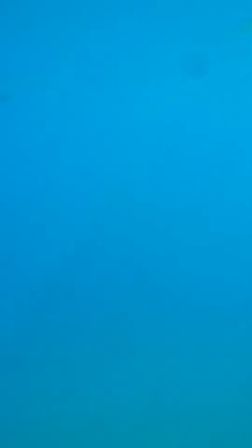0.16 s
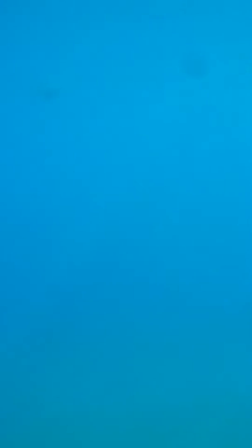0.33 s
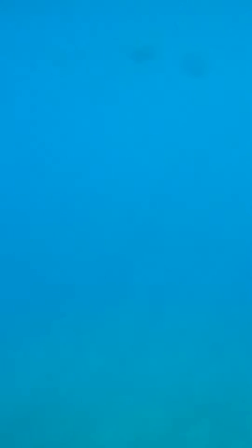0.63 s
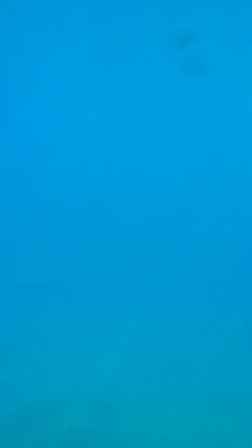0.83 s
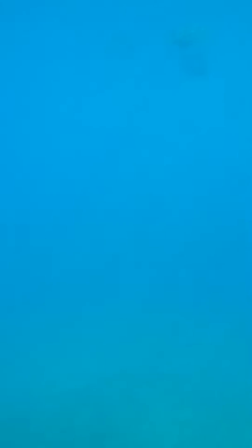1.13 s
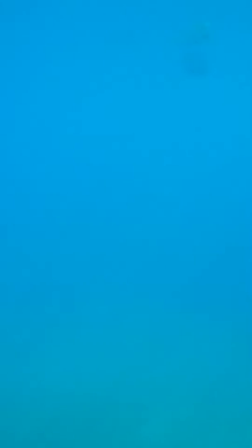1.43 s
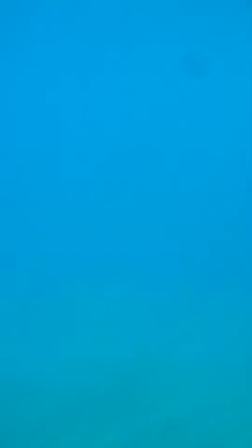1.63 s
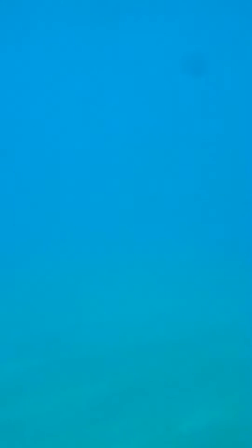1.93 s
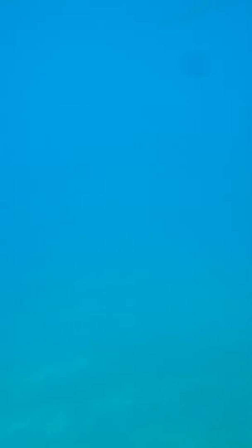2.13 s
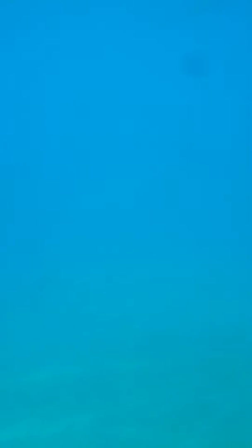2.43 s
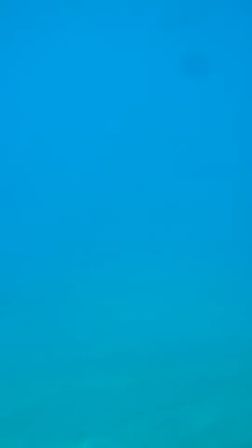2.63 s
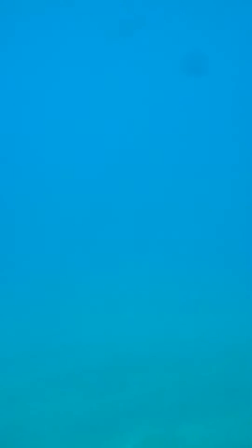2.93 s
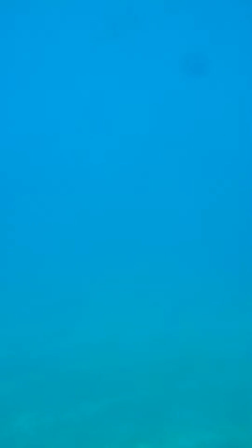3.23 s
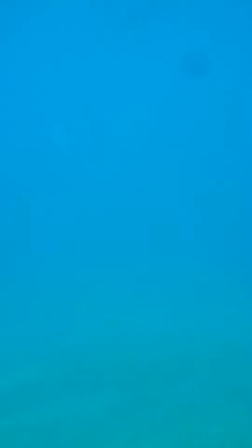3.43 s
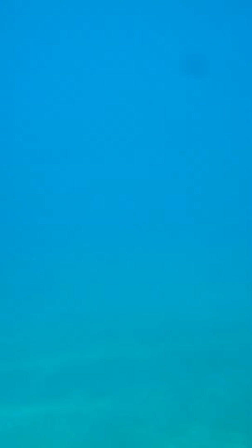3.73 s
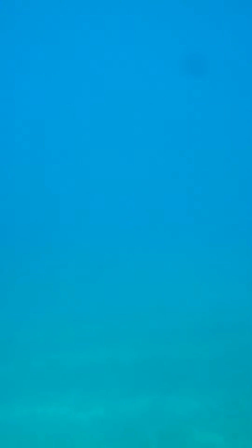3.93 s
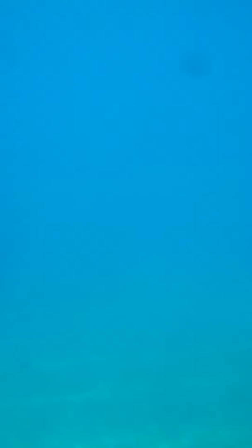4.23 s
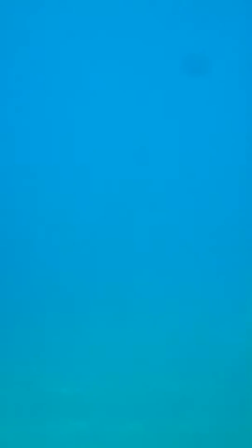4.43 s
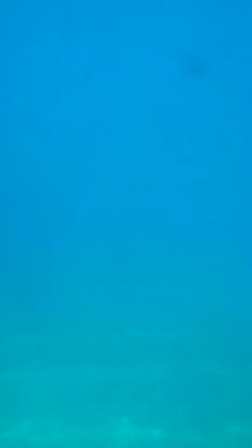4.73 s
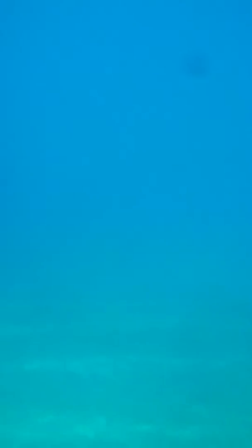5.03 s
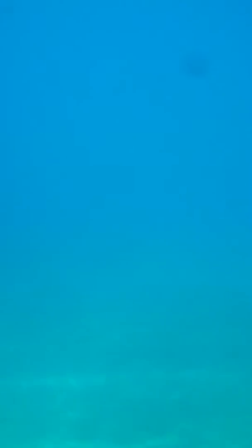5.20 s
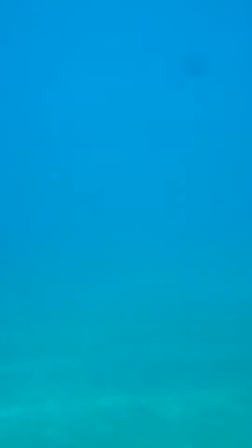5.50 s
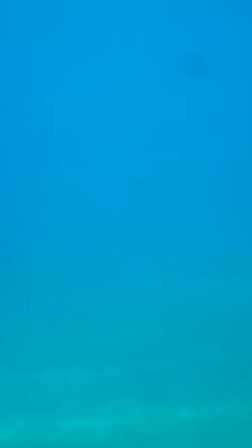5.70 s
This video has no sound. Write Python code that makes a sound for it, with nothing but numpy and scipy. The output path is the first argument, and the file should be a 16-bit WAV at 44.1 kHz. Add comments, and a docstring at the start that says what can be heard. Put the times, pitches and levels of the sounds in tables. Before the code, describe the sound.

Underwater, a boat engine and propeller drone with a low throbbing hum that turns rougher, amid snapping shrimp and a few bubble gulps.

```python
"""Under water near a moving boat, on two microphones in a sealed housing; shrimp snap all around.
From the start the shaft orders hum and beat into a throb, the machinery rattles in step with the crank,
and a few bubbles gulp close by. From about 2 s the paths through the water add up to a sliding boom.
Near 3 s the direct path from the engine drops away, and the gear whine and valve ticks fade with it.
Towards the end the propeller churns hardest and the loudest shrimp cracks nearby."""
import sys
import numpy as np
from scipy import signal
from scipy.fft import rfft, irfft
from scipy.io import wavfile
from scipy.ndimage import uniform_filter1d, minimum_filter1d, map_coordinates

SR = 44100
rng = np.random.default_rng(int(sys.argv[2]) if len(sys.argv) > 2 else 0)


def inscribe(sig):
    """Save sig as 16-bit PCM at rate SR to the path in sys.argv[1].

    A 1-D sig is mono; a 2-D sig holds one channel per row.
    Samples are clipped to [-1, 1] before scaling.
    """
    pcm = np.round(np.clip(np.atleast_2d(sig).T, -1, 1) * 32767)
    wavfile.write(sys.argv[1], SR, pcm.astype(np.int16))


N = 258426
TIME, BINS = np.arange(N) / SR, np.fft.rfftfreq(N, 1 / SR)

# Engine speed; an order is a multiple of it. Each row: time in seconds, crank turns per second.
CRANK_SPEED = [(0.0, 29.54), (0.25, 29.59), (1.75, 29.4), (2.0, 29.78), (2.25, 29.58), (2.75, 29.52),
               (3.0, 28.94), (3.75, 29.65), (4.0, 29.71), (4.5, 29.51), (4.75, 28.92), (5.0, 28.99),
               (5.25, 28.67), (5.86, 28.58)]
# The firing note (order 3) and the hum (order 6). Each row: time in seconds, level in dB.
FIRING_LEVEL = [(0, -20), (.8, -24), (2.6, -26), (3.7, -35.5), (4.7, -38), (5.86, -30)]
HUM_LEVEL = [(0, -12.5), (.33, -10), (.8, -16.5), (1.3, -12.5), (1.8, -16), (2.2, -12), (3.85, -15.5),
             (4.22, -12), (4.85, -19), (5.5, -13.5), (5.86, -16.5)]
# Tones that beat against the hum. Each row: order, level in dB.
BEATING_ORDERS = [(7, -23), (8, -32.5), (9, -43)]
# Faint shaft tones. Each row: order, level in dB, dB gained per dB of the direct path.
WEAK_ORDERS = [(1, -50, 0.1), (2, -48, 0), (4, -34, 0), (5, -32, 0.5), (12, -42.5, .5), (13, -42, 0.5)]
# The band where paths through the water add up; it slides as the boat moves and lifts the strong
# orders it meets. Each row: time in seconds, centre in Hz, level in dB.
BOOM_BAND = [(0, 195, -42.5), (1.1, 223.6, -41), (1.95, 224.2, -21), (2.6, 228, -21.5), (3.05, 210, -15),
             (3.5, 250.6, -27.5), (3.88, 241, -18), (4.03, 205.4, -14.5), (4.25, 174, -28),
             (4.65, 202, -21), (4.9, 249, -18), (5.22, 254.7, -15.5), (5.4, 194, -15), (5.86, 194.3, -16)]
# The direct path from engine to microphones. Each row: time in seconds, gain in dB.
DIRECT_PATH = [(0, -0.6), (1.8, 0), (2.85, -0.5), (3.25, -13), (5.86, -20.5)]
# How hard the propeller churns. Each row: time in seconds, gain in dB.
PROPELLER_SURGE = [(0, 1.8), (.4, 1.45), (.9, -3.5), (2.65, 2.6), (3.03, -1.8), (3.35, 1), (3.75, 0.86),
                   (4.65, -3), (5.15, 0.5), (5.65, 4), (5.86, 2.6)]
# How the rattle pulses over the engine's cycle. Each row: order, relative depth.
KNOCK_ORDERS = [(.5, .2), (1, 0.36), (2, 0.13), (3, 0.38), (4, 0.13), (5, 0.31), (7, 0.099)]
# The gear mesh series. Each row: factor on the whine's pitch, relative level in dB.
MESH_PARTIALS = [(.8, -6.5), (0.999, 2), (1.2, -11)]
# Hull modes that ring throughout. Each row: pitch in Hz, width in Hz, relative level in dB.
STEADY_MODES = [(1028, 45, -4), (1135, 76, -0.5)]
# Hull modes that swell once as the boat moves. Each row: time of the peak in seconds,
# half-width of the swell in seconds, level in dB, pitch in Hz, glide in Hz per second, width in Hz.
SWELLING_MODES = [(1.9, .95, -44, 561, -48.5, 66), (3.0, 1, -50, 2353, 6, 100.3),
                  (3.6, .6, -36.5, 925, 12, 129.7), (4.049, 0.32, -39, 1107, 90.5, 70.4),
                  (4.65, 0.21, -57, 3480, 0, 280), (5.3, .45, -51.5, 1854, 15.5, 27.9),
                  (5.2, .12, -33.5, 1147, -30, 50), (5.55, 0.23, -42, 749, -40, 70.3),
                  (5.65, .17, -38, 1025, -250, 49.7)]
# The tone colour of each noise. Each row: frequency in Hz, relative level in dB.
WASH_SPECTRUM = [(200, -13.5), (280, 3), (340, -3.5), (410, -6.5), (480, -14), (560, -13), (680, -17.5),
                 (800, -24)]
HULL_SPECTRUM = [(600, -18), (780, -6), (860, -8.5), (960, -7), (1030, 1.5), (1090, -8.5), (1170, -2.5),
                 (1230, -8), (1350, -27)]
GEAR_SPECTRUM = [(1150, -17), (1300, -1), (1420, -3), (1540, -5.5), (1660, 4), (1830, 1.5), (2100, 0.5),
                 (2350, 0), (2700, -4.5), (3200, -10), (4200, -17), (4800, -23)]
HISS_SPECTRUM = [(4800, -12), (6100, -2), (7200, -1.5), (8000, -9), (9000, -15), (10500, -19.5),
                 (12000, -43.5)]
RUMBLE_SPECTRUM = [(15, -32), (45, -29.5), (62, -16.5), (80, -2), (120, -3.5), (160, 10), (215, 11.5),
                   (255, -4), (290, -9), (350, -22)]
SNAP_SPECTRUM = [(2500, -9), (4800, -8), (6200, 4), (7300, 3.5), (8500, -12.5), (10300, -13),
                 (12300, -22.5), (14200, -18.5), (15000, -33)]
# Bubbles by the housing. Each row: start in seconds, peak in dB, pitch in Hz, seconds to fall 60 dB.
CLOSE_BUBBLES = [(.451, 3.5, 162.9, .09), (.86, -30, 716, 0.11), (.907, -8.5, 160, .09),
                 (1.085, -31.5, 806, 0.11), (1.112, -28.5, 694, 0.099), (1.684, -5.5, 148.4, 0.043),
                 (2.339, -15.5, 388, 0.059), (2.469, -11, 331, 0.045), (2.75, -23, 883, 0.075),
                 (3.29, -28.5, 713, 0.042), (3.579, -12, 160, 0.054), (4.114, 0, 170, 0.066),
                 (4.365, -23.5, 932, 0.068)]
# Nearby shrimp. Each row: start in seconds, relative peak in dB, lower-treble boost in dB.
NEAR_SNAPS = [(0.1585, -29, 14.5), (0.344, -25, 3), (1.6815, -27, 5), (1.81, -35.5, -4), (2.008, -30.5, 5),
              (2.117, -36, 7), (2.2306, -27.5, 3), (2.2577, -27, -3), (2.3325, -32.5, -2), (2.5336, -36, 2),
              (2.7385, -30, -4), (2.938, -35.5, -12), (3.029, -33, -12), (3.6828, -33, 2), (3.9454, -40, 6),
              (4.2788, -34.5, -7), (4.3302, -32, -5), (4.368, -35, -1), (4.9192, -33.5, -1),
              (5.376, -35.5, 3), (5.449, -25.5, 6), (5.5809, -21.5, 17), (5.638, -30.5, -3)]
# The housing at its two microphone ports. Each row: frequency in Hz, left over right in dB,
# phase lead of the left in radians, coherence.
MIC_PORTS = [(252, 0.87, 0, 1), (462, -3.5, 0.46, 1), (630, -6, 1, 0.85), (865, 5, 2.5, 0.72),
             (1215, 9, 3.5, 1), (1600, 1.5, 5.5, 0.22), (1870, 5, 4.5, 0.64), (2620, -3, 5.5, .92),
             (3370, 1, 4.5, 0.85), (4500, 17.5, 7, 0.17), (5640, 15, 7, 0.18), (7800, -9.5, 12, 0.1)]

# Noises that follow the surge. Each gives: base level in dB, dB per dB of surge, drift in dB per second.
WASH_LEVEL, HISS_LEVEL, SINGING_LEVEL = (-33.5, 1.4, -0.15), (-53.5, 1, -.05), (-61.5, 1.3, -.15)
HULL_LEVEL, MODE_LEVEL, GEAR_LEVEL = (-37.5, 0.81, .5), (-46.5, 0.98, 0.31), (-40.5, 1.05, -0.76)


def shaft_drone(angle, boom_width_hz=18.3, lag_rad=0.49):
    """Shaft orders beat into one throb a turn; the propeller's uneven wake shakes the higher ones most."""
    out = np.zeros(N, complex)
    strong = [(3, curve(FIRING_LEVEL)), (6, curve(HUM_LEVEL))] + BEATING_ORDERS
    for k, (order, db) in enumerate(strong):
        if k < len(strong) - 2:
            shake = 1 + .11 * waver(rate_hz=11)
        else:  # shallow water delays the top two orders, which rounds each throb
            delay = np.exp(-1j * lag_rad * (k - 1) * (k - 2))
            shake = (1 + .49 * waver(rate_hz=13)) * delay
        offset_hz = order * curve(CRANK_SPEED) - curve(BOOM_BAND)
        boom = amp(curve(BOOM_BAND, column=2)) * bell(offset_hz, boom_width_hz)
        out += (amp(db) + boom) * np.exp(1j * order * angle) * shake
    for order, db, share in WEAK_ORDERS:
        tone = np.exp(1j * (order * angle + 2 * np.pi * rng.random()))
        out += amp(db + share * curve(DIRECT_PATH)) * tone * (1 + .6 * waver(rate_hz=5.5))
    return np.sqrt(2) * out.real


def machinery(angle):
    """The crank drives the propeller, hull, gears and valves, so all pulse in step."""
    knocking = rattle(angle, repeat=0.49, depth=0.88)
    meshing = rattle(angle, repeat=0.5, depth=0.55)
    fizzing = rattle(angle, repeat=0.2, depth=0.34)
    churning = rattle(angle, repeat=0.42, depth=0.62)
    return wash(churning) + hull(knocking) + gears(meshing) + cavitation(fizzing) + valve_ticks(angle)


def rattle(angle, repeat, depth):
    """Noise that partly repeats every two crank turns and comes in knocks."""
    size = int(4 * np.pi * N / angle[-1])
    place = angle / (4 * np.pi) * size
    cycle = np.array([map_coordinates(rng.standard_normal(size), [place], mode="grid-wrap")
                      for _ in range(2)])
    noise = np.sqrt(repeat) * cycle + np.sqrt(1 - repeat) * rng.standard_normal((2, N))
    knocks = sum(weight * np.cos(order * angle + 2 * np.pi * rng.random())
                 for order, weight in KNOCK_ORDERS)
    return noise * np.exp(depth * knocks)


def wash(churning):
    """Water rushes off the propeller, louder as it surges."""
    return surging(WASH_LEVEL) * colour(churning, WASH_SPECTRUM)


def hull(knocking):
    """Knocks rattle the hull and ring its plates: two modes hold, the others swell and fade."""
    modes = surging(MODE_LEVEL) * sum(amp(db) * ring(knocking, hz, width) for hz, width, db in STEADY_MODES)
    for peak_s, swell_s, db, hz, glide, width in SWELLING_MODES:
        t = TIME - peak_s
        modes += amp(db) * bell(t, swell_s) * ring(knocking, hz + glide * t, width)
    return surging(HULL_LEVEL) * colour(knocking, HULL_SPECTRUM) + modes


def gears(meshing, whine_order=65.15, whine_db=-43):
    """Meshing teeth clatter through the hull; their whine arrives by the direct path."""
    clatter = surging(GEAR_LEVEL) * colour(through_plates(meshing), GEAR_SPECTRUM)
    whine_hz = whine_order * curve(CRANK_SPEED)
    whine = sum(amp(db) * ring(meshing, factor * whine_hz, width_hz=95) for factor, db in MESH_PARTIALS)
    return clatter + amp(whine_db + curve(DIRECT_PATH)) * whine


def cavitation(fizzing, singing_hz=6910, fall_hz_per_s=150):
    """The propeller's cavitation hisses, with a thin singing that slowly falls."""
    hiss = surging(HISS_LEVEL) * colour(through_plates(fizzing), HISS_SPECTRUM)
    singing = ring(fizzing, singing_hz - fall_hz_per_s * TIME, width_hz=380)
    return hiss + surging(SINGING_LEVEL) * singing


def valve_ticks(angle, base_db=-57.5, sharpness=7, uneven_db=4):
    """Eight short valve ticks in every two crank turns, each of its own strength."""
    phase = 4 * angle
    valve = (phase / (2 * np.pi) + .5).astype(int) % 8
    strength = amp(uneven_db * rng.standard_normal(8))[valve]
    gate = strength * np.exp(sharpness * (np.cos(phase) - 1))
    ticks = through_plates(gate * rng.standard_normal((2, N)))
    level_db = base_db + curve(PROPELLER_SURGE) + .6 * curve(DIRECT_PATH)
    return amp(level_db) * colour(ticks, [(3000, -9), (4400, 4), (4750, -7.5), (5200, 2.5), (5800, -10.5)])


def through_plates(x, depth_db=2.5, spacing_hz=70):
    """The hull's many plate modes comb a sound into fine peaks and dips."""
    knots = np.arange(0, SR / 2, spacing_hz)
    ripple = np.clip(rng.standard_normal(len(knots)), -2, 2)
    return irfft(rfft(x) * amp(depth_db * np.interp(BINS, knots, ripple)), N)


def bubbles(swell_cycles=1.1, rise=0.39):
    """Close to the housing, each bubble swells and rings briefly, its pitch climbing a little."""
    out, t = np.zeros(N), TIME[:SR // 4]
    for start, db, hz, t60 in CLOSE_BUBBLES:
        shape = (1 - np.exp(-(t * hz / swell_cycles) ** 2)) * amp(-60 * t / t60)
        tone = np.sin(2 * np.pi * hz * (t + rise * t ** 2))
        add(out, start, amp(db) * shape / shape.max() * tone)
    return out


def shrimp(near_db=7, far_db=-41.5, spread_db=4.0, far_per_s=14):
    """A few snaps near the microphones over a crackle of distant ones."""
    out = np.zeros((2, N))
    for start, db, body_db in NEAR_SNAPS:
        add(out, start, amp(db + near_db) * snap(body_db))
    for when, chance in rng.random((int(far_per_s * N / SR), 2)):
        db = far_db + spread_db * min(-np.log(chance), 2)
        add(out, when * N / SR, amp(db) * snap())
    return out


def snap(body_db=0, body_hz=3500, body_width_hz=1500, t60=0.017, tail_db=-23, tail_t60=0.39):
    """A shrimp's crack rings the housing and scatters off the sea bed; peak 1."""
    t = TIME[:SR // 10]
    spectrum = [(hz, db + body_db * bell(hz - body_hz, body_width_hz)) for hz, db in SNAP_SPECTRUM]
    decay = amp(-60 * t / t60) + amp(tail_db - 60 * t / tail_t60)
    crack = colour(rng.standard_normal((2, len(t))), spectrum) * decay
    return crack / abs(crack).max()


def rumble(db=-19.5):
    """Churned water booms behind the hum."""
    return amp(db) * colour(rng.standard_normal((2, N)), RUMBLE_SPECTRUM)


def housing(pair):
    """The shell's modes reach the two microphones with different strength and phase."""
    balance_db, lead, coherence = (response(MIC_PORTS, BINS, column) for column in (1, 2, 3))
    shared, separate = rfft(pair)
    left = shared * amp(balance_db)
    right = (coherence * shared + np.sqrt(1 - coherence ** 2) * separate) * np.exp(-1j * lead)
    return irfft(np.array([left, right]) * np.sqrt(2 / (1 + amp(balance_db) ** 2)), N)


def surging(level):
    """The gain of a noise that follows the propeller's surge and drifts as the boat moves."""
    db, share, drift = level
    return amp(db + share * curve(PROPELLER_SURGE) + drift * TIME)


def ring(drive, hz, width_hz):
    """A moving resonance of unit power: shift its pitch to zero, smooth twice, shift back."""
    turn = np.exp(2j * np.pi * np.cumsum(hz * np.ones(N)) / SR)
    pole = np.exp(-np.pi * width_hz / SR)
    slow = signal.lfilter([1], [1, -2 * pole, pole * pole], drive * turn.conj())
    return unit_power((slow * turn).real)


def colour(x, spectrum):
    """Gives x a spectrum that falls steeply past both ends, and unit power."""
    hz = np.fft.rfftfreq(x.shape[-1], 1 / SR) + 1
    rolloff = (1 + (hz / spectrum[-1][0] / 1.2) ** 12) * (1 + (spectrum[0][0] / hz / 1.2) ** 12)
    return unit_power(irfft(rfft(x) * amp(response(spectrum, hz)) / rolloff, x.shape[-1]))


def waver(rate_hz):
    """Slow complex noise of unit power, to shake a tone's level and phase."""
    t = TIME[::100]
    noise = rng.standard_normal(len(t)) + 1j * rng.standard_normal(len(t))
    lowpass = bell(np.fft.fftfreq(len(t), t[1]), rate_hz)
    return np.interp(TIME, t, unit_power(np.fft.ifft(np.fft.fft(noise) * lowpass)))


def curve(rows, column=1):
    """One column of a table, joined by straight lines in time."""
    rows = np.asarray(rows)
    return np.interp(TIME, rows[:, 0], rows[:, column])


def response(rows, hz, column=1):
    """One column of a table, joined by straight lines in log frequency."""
    rows = np.asarray(rows)
    return np.interp(np.log(hz + 1), np.log(rows[:, 0] + 1), rows[:, column])


def add(mix, start_s, sound):
    part = mix[..., max(round(start_s * SR), 0):][..., :sound.shape[-1]]
    part += sound[..., :part.shape[-1]]


def bell(offset, width):
    return np.exp(-.5 * (offset / width) ** 2)


def amp(db):
    return 10 ** (np.asarray(db) / 20)


def unit_power(x):
    return x / np.sqrt(np.mean(abs(x) ** 2) + 1e-20)


def scene():
    """Boat, bubbles and shrimp, picked up through the housing."""
    angle = 2 * np.pi * np.cumsum(curve(CRANK_SPEED)) / SR  # of the crank, in radians
    water = shaft_drone(angle) + bubbles() + rumble() + machinery(angle) + shrimp()
    return housing(water * signal.windows.tukey(N, .002))


def record(dry, ceiling=0.87, cutoff_hz=15700):
    """Behind the microphones, a limiter eases down the tallest throbs and a low-pass trims the top."""
    allowed = np.minimum(1, ceiling / (abs(dry).max(0) + 1e-9))
    gain = uniform_filter1d(minimum_filter1d(allowed, size=900), size=900)
    lowpass = signal.firwin(511, cutoff_hz, window=("kaiser", 9), fs=SR)
    return signal.oaconvolve(dry * gain, lowpass[None], "same")


dry = scene()
out = record(dry)
inscribe(out)
```